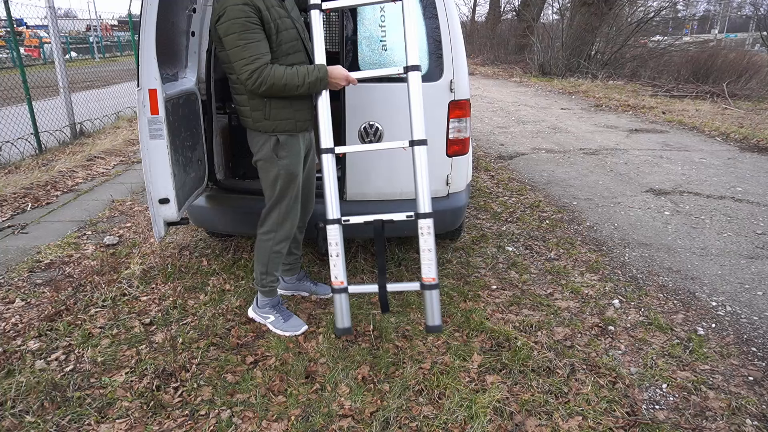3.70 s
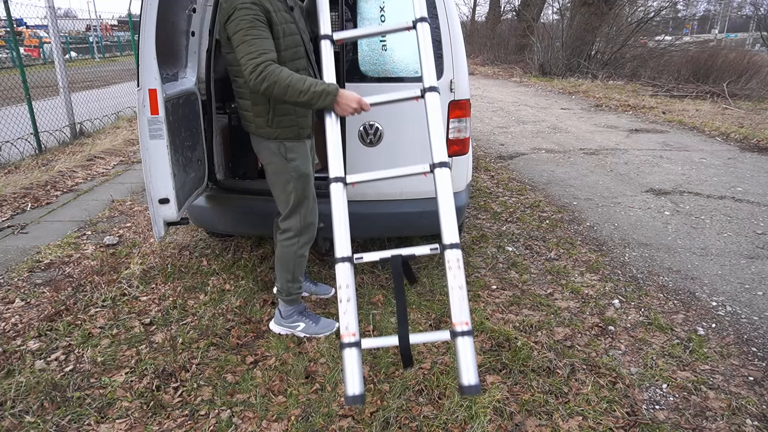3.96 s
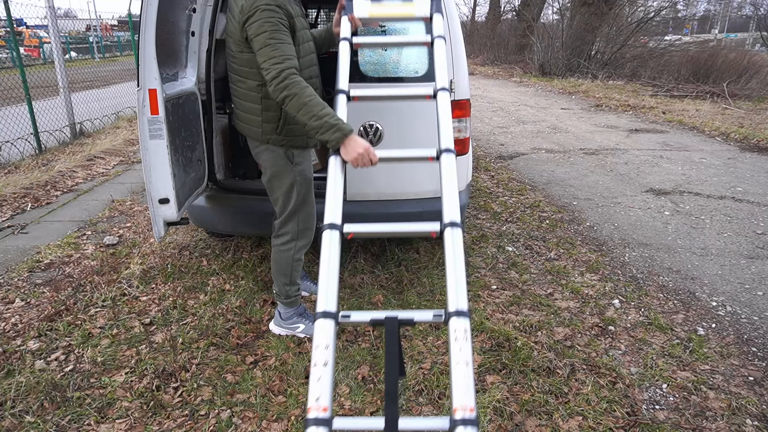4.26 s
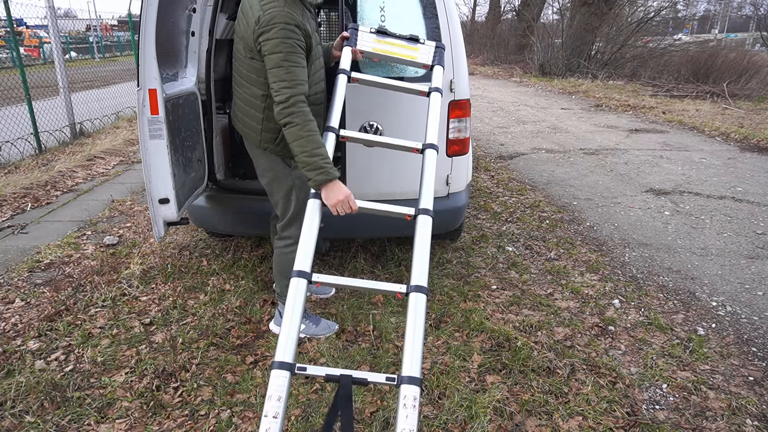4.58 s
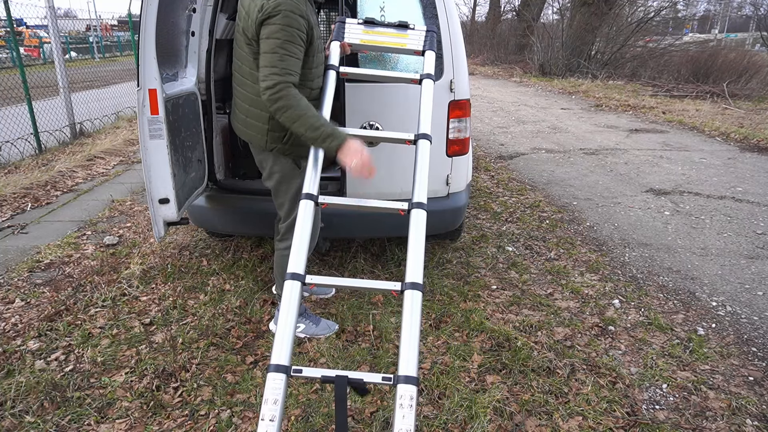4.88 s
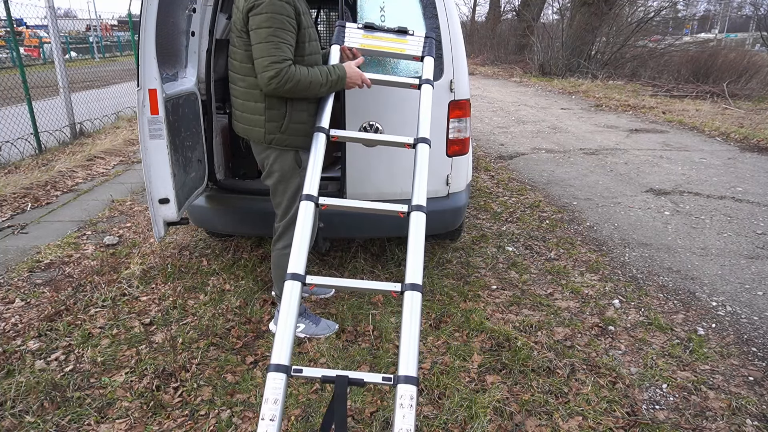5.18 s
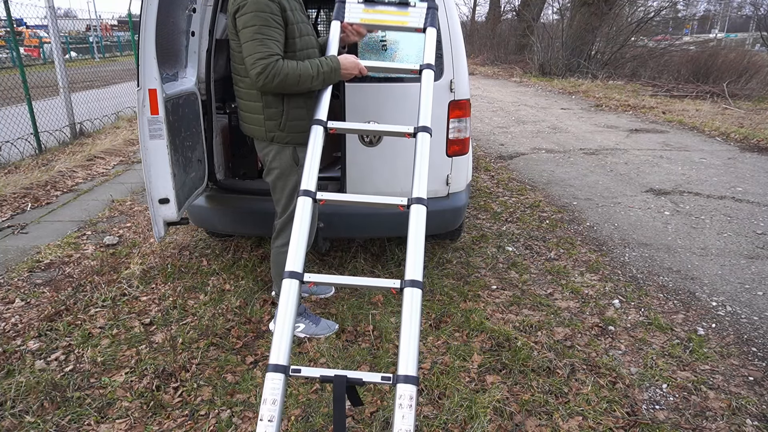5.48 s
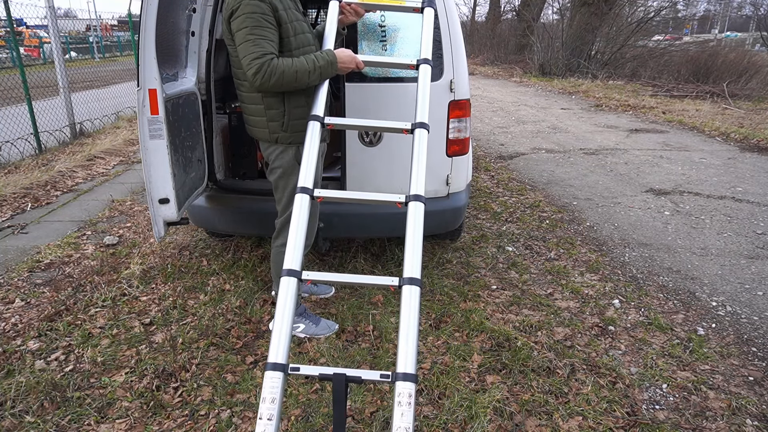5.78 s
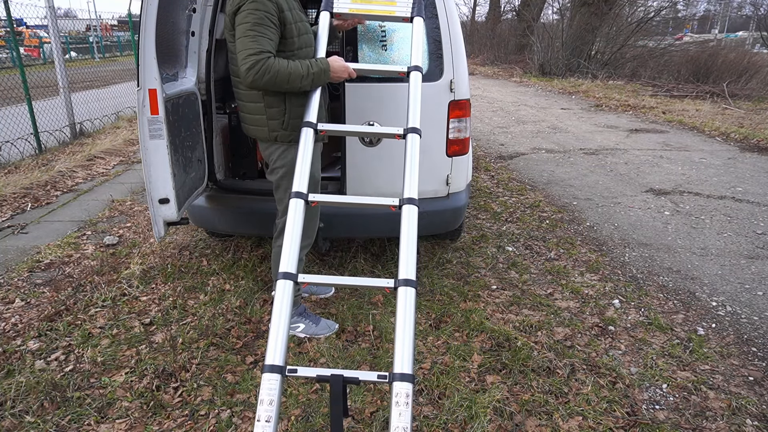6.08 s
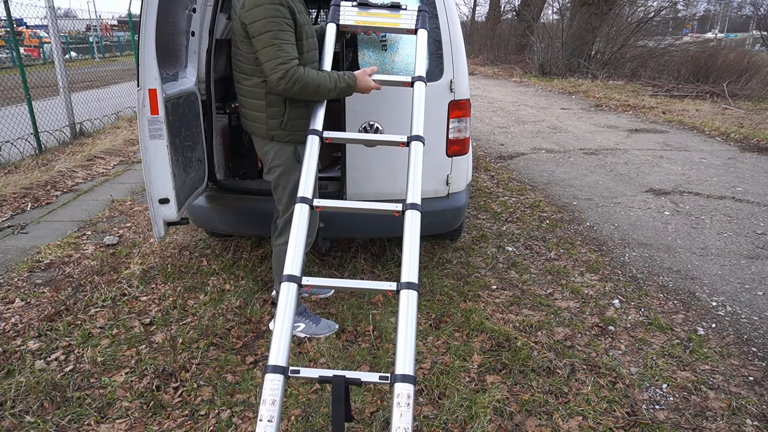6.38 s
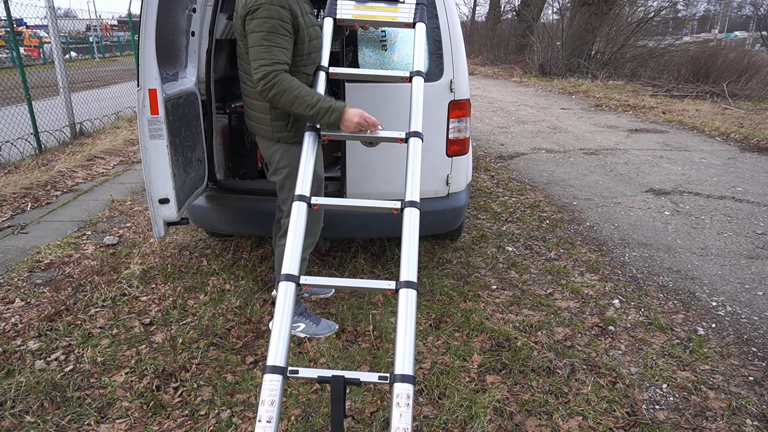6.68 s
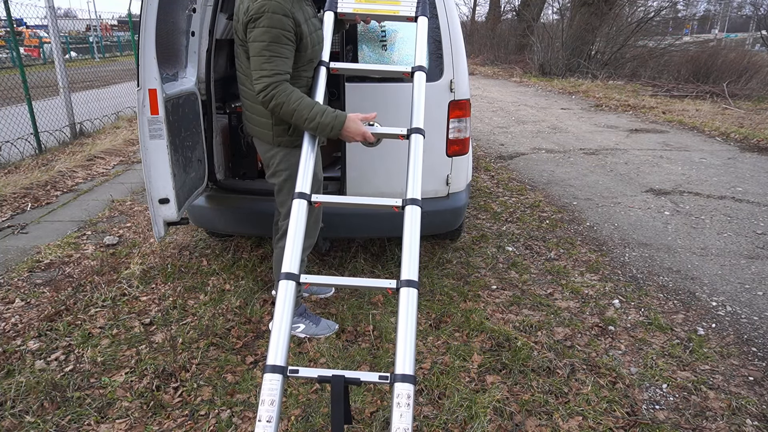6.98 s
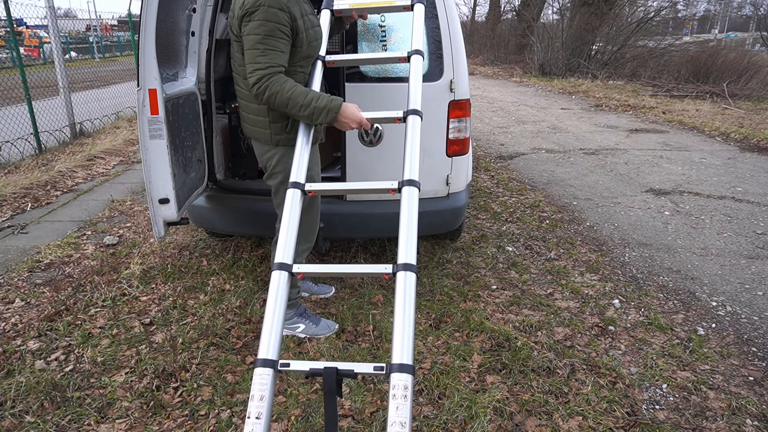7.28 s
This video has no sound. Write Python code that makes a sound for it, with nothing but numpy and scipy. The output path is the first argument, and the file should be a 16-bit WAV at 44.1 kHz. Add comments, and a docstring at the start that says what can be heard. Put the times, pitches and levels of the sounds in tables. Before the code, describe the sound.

Close by outdoors, an aluminium telescopic ladder is pulled out section by section. Tubes hiss through plastic collars and knock into their latches in a quick run of sharp clicks and rattles, the hardest snaps distorting slightly. In a lull, nylon jacket sleeves swish among a few ticks. One last slide snaps home, followed by scattered rattles, bumps and knocks. Distant traffic hums steadily throughout.

```python
"""Tyres roar on a distant road and a nylon jacket rustles as a man, close by on a verge, pulls out an
aluminium telescopic ladder. Tubes hiss through their plastic collars, pins tick, and the sections knock
into their stops, one rail just after the other; the hardest latch snaps overload and clip. Loose sections
rattle and a hand bumps the frame. In a lull his sleeves swish as he reaches for the next rung, then a
last slide snaps home, and a few rattles, bumps and knocks follow."""
import sys
import numpy as np
from scipy import signal
from scipy.io import wavfile
from scipy.ndimage import map_coordinates

SR = 44100
rng = np.random.default_rng(int(sys.argv[2]) if len(sys.argv) > 2 else 0)


def log_audio(samples):
    """Write samples as a 16-bit WAV file to the path given in sys.argv[1]."""
    # one column per channel
    frames = np.atleast_2d(samples).T
    # limit to full scale, then quantise
    limited = np.clip(frames, -1, 1)
    pcm = np.round(limited * 32767).astype(np.int16)
    wavfile.write(sys.argv[1], SR, pcm)


N = 332514
TIME = np.arange(N) / SR
AGE = TIME[:SR // 3]  # time since a blow

# Levels in the tables are relative; each layer sets its own gain.
# passing traffic: t/s, level/dB, nominal tyre pitch f/Hz
TRAFFIC = [(0, -34.5, 930), (.6, -34.5, 927), (1.3, -34.5, 924), (2.3, -35.5, 910), (3.6, -34.5, 950),
           (4.5, -34, 1037), (5.5, -35, 986), (6.2, -33, 1035), (7.54, -33, 983)]
# tone of the road, engine rumble below and tyre roar above: f/Hz, level/dB
ROAD_SPECTRUM = [(25, -59), (45, -8.5), (85, -2.5), (130, -6.5), (240, -14.5), (370, -13), (520, -9.5),
                 (720, -6.5), (950, -0.5), (1400, -6.5), (2200, -19.5), (3800, -31.5)]
# faint bed of jacket rustle: t/s, level/dB
RUSTLE_BED = [(0, -48), (.55, -46), (.75, -49), (1.25, -53), (2.9, -47.5), (3.45, -43), (3.6, -72),
              (4.95, -57.5), (5.15, -49), (6.3, -43.5), (7.54, -56.5)]
# sleeve swishes as the arms reach: loudest moment t/s, level/dB, half length/s
SWISHES = [(0.494, -48, 0.25), (1.314, -38.5, 0.036), (3.128, -42.5, 0.037), (3.324, -36.5, 0.036),
           (3.996, -39, 0.066), (4.155, -43, 0.12), (4.775, -41, .03), (6.076, -38.5, 0.034),
           (6.58, -43.5, 0.057), (7.106, -34.5, 0.056), (7.219, -36, 0.039), (7.454, -36.5, .11)]
# tone of rubbing nylon: f/Hz, level/dB
NYLON_SPECTRUM = [(150, -3), (450, -2), (1000, -21), (3000, -10), (4300, -2.5), (7500, -5.5), (9000, -4),
                  (12000, -6), (13500, -11.5), (16000, -12)]
# tubes sliding through collars: start t/s, end t/s, full-speed level/dB, run-up/s
TUBE_SLIDES = [(0.11, 0.367, -36, 0.11), (0.83, 1.043, -32, 0.082), (1.343, 1.835, -27, 0.13),
               (1.87, 2.813, -40.5, 0.017), (5.312, 5.66, -35.5, 0.32)]
# resonances that sing, one list a slide: f/Hz, half width/Hz, level/dB
SLIDE_RESONANCES = [
    [(1410, 650, 6.5), (4400, 920, 5), (6400, 660, 0), (8600, 690, 2), (11200, 820, -3)],
    [(474, 150, -2), (3580, 350, -7), (5650, 500, -16.5), (11200, 900, -16)],
    [(488, 164, 2), (880, 140, 2), (1470, 280, 3.5), (1790, 510, -4.5), (3800, 1200, -8), (4440, 380, -12),
     (6370, 500, -5), (7100, 450, -6), (7900, 400, -7), (12300, 2600, -19.5)],
    [(477, 104, 8.5), (2430, 630, -6), (3360, 97, -3), (4330, 970, -6.5), (6070, 1100, -7),
     (10200, 2000, -16)],
    [(1550, 270, 7), (2040, 350, 6), (2600, 220, -2), (3630, 300, -0.5), (4900, 520, -4.5),
     (9750, 3000, -11), (14300, 1200, -14)],
]
# bass, middle, presence and top bands of the hits: low f/Hz, high f/Hz
HIT_BANDS = [(190, 700), (700, 2300), (2500, 8000), (8000, 14500)]
# locking pins and small loose parts: t/s, level/dB, top against presence/dB, ring f/Hz
PIN_TICKS = [(0.1168, -17.5, 0.5, 4000), (0.3981, -19.5, 4, 11300), (1.0659, -17, 5, 11300),
             (1.807, -10.5, -6, 6500), (3.0725, -15.5, 5.5, 12320), (3.124, -25.5, 7, 8800),
             (3.2753, -19.5, 1, 12100), (3.283, -14, 4.5, 11000), (3.3358, -23.5, -5.5, 6600),
             (4.6036, -19, -20, 5400), (5.685, -15, -20, 4350), (5.8469, -26.5, 1, 3170),
             (6.218, -24, -2, 1160), (6.474, -12, 1, 4770), (7.4345, -25.5, 2, 5000)]
# sections hitting a stop or latch: t/s, second rail lag/ms, first rail level/dB, second rail level/dB,
# chatter/ms, bass/dB, middle/dB, top/dB (all three against presence), tube f/Hz, favoured frame f/Hz
STOP_KNOCKS = [(0.118, 9, -18, -16, 1.3, -1, 0, -30, 1150, 250),
               (0.318, 10.8, -13, -15, 2.9, -4.5, 3, -14, 3690, 330),
               (0.5997, 12.8, -11, 4.5, 4.3, -20, 2.5, -13, 1550, 330),
               (0.66, 14.3, -9, -10, 5.8, -5.5, -3.5, -5, 5930, 500),
               (1.009, 6.4, -4.5, 3.5, 4.7, -8, -2, -6.5, 4600, 320),
               (1.111, 12.3, -20.5, -19, 3, -0.5, 1, -12, 4540, 800),
               (1.320, 4.4, -31, -14, 2.4, -20, 2, -13, 4200, 500),
               (1.5158, 9.5, -8, -11.5, 6.4, -1.5, 3, -10, 1340, 800),
               (1.7448, 2, -14, -14, 1.3, -10, 10, -10, 1450, 500),
               (1.7874, 3.5, -15, 4.5, 4.2, -11, -0.5, -7, 7050, 330),
               (1.869, 9.6, -11, -12, 2.06, -3.5, -4, -3, 4760, 250),
               (2.0483, 5.5, -6, 0.5, 10.5, -7.5, -8, -3, 1850, 570),
               (2.251, 6, -28.5, -23.5, 4.7, -7, 2, -22, 2520, 350),
               (2.445, 15.5, -15.5, -17.5, 2.25, -5, 2.5, 3, 7550, 480),
               (2.51, 4.8, -14.5, -8, 4.9, -2.5, 3, -5.5, 7320, 820),
               (3.367, 4.9, -28, -15.5, 1.25, -1, -7, -12, 6170, 430),
               (4.589, 8.3, -18, -12, 5.5, 0.5, 5, -6.5, 5340, 700),
               (5.639, 12.9, -17.5, 1, 10.6, -18, -2.5, -10, 3047, 520),
               (5.917, 16.7, -28, -15, 2.6, -14, 3, 5, 2560, 500),
               (6.7124, 3.96, -31, -15, 2.8, 3.5, 3, -10, 6030, 510),
               (7.0386, 3, -10.5, -20, 2.4, -0.5, 6.5, 10.5, 4820, 450)]
# lasting ring of the whole ladder: f/Hz, level/dB, t60/s
LADDER_MODES = [(1570, 3.5, 0.08), (1750, 11, 0.1), (2960, 8.5, 0.13), (4350, 20.5, 0.086), (5360, -6, .08),
                (6360, -30, 0.054), (7700, -19, .07), (8300, -17, .07), (9900, -11, .06)]
# hollow body of the frame, stirred by the bass of a blow: f/Hz, level/dB, t60/s
FRAME_MODES = [(260, -13, 0.043), (361, -8.5, .07), (512, 17, 0.034), (807, -1.5, .045)]
# loose sections shaking in their collars: t/s, length/s, level/dB
SECTION_RATTLES = [(1.845, .055, -16.5), (2.274, .11, -30.5), (2.68, 0.037, -27), (5.768, .036, -19.5),
                   (5.896, .056, -15.5)]
# hands bumping the frame: t/s, level/dB, f/Hz, t60/s
HAND_THUDS = [(2.63, -28, 185, 0.092), (6.4757, -4, 221, 0.012), (7.161, -19, 217, 0.037),
              (7.298, -20, 229, 0.039)]


def undb(db):
    """Decibels to gain."""
    return 10 ** (np.asarray(db) / 20)


def unit(x):
    """Scale to an energy of 1."""
    return x / np.sqrt(np.sum(x ** 2))


def fade(t60):
    """Decay by 60 dB in t60 seconds."""
    return np.exp(-np.log(1000) * AGE / t60)


def ring(hz, t60):
    """One struck mode."""
    return np.sin(2 * np.pi * hz * AGE) * fade(t60)


def band(x, edges):
    """Band-pass between two edges in Hz."""
    return signal.sosfilt(signal.butter(3, edges, "band", fs=SR, output="sos"), x)


def add(out, s, x):
    """Mix x into out from time s."""
    i = int(s * SR)
    out[i:i + len(x)] += x[:N - i]


def colour(points, hz):
    """Gain of an EQ curve (f/Hz, level/dB) at the given frequencies."""
    f, db = np.transpose(points)
    return undb(np.interp(np.log(hz + 1), np.log(f), db))


def fader(curve, edge_s=0.012):
    """Gain along a curve (t/s, level/dB), with soft ends."""
    s, db = np.transpose(curve)
    soft_ends = np.clip(np.minimum(TIME - s[0], s[-1] - TIME) / edge_s, 0, 1)
    return undb(np.interp(TIME, s, db)) * soft_ends


def wobble(rate):
    """Random modulation gliding to a new value rate times a second."""
    return 0.82 * np.interp(TIME * rate, np.arange(N), rng.standard_normal(N))


def patches(rows, columns):
    """Smooth random modulation over frequency and time, both counted in patches."""
    grid = np.meshgrid(rows, columns, indexing="ij")
    return map_coordinates(rng.standard_normal((100, 400)), grid, order=1, mode="mirror")


def road(gain_db=4, usual_hz=1000, flicker_db=1.0, air_db_per_octave=-7.5):
    """Tyre roar swells and shifts pitch as cars pass, over engine rumble; distance takes the treble."""
    f, t, noise = signal.stft(rng.standard_normal(N), SR, nperseg=2048)
    hz = f[:, None]
    s, db, pitch_hz = np.transpose(TRAFFIC)
    tyre_share = np.clip(hz / 500, 0, 1)
    shift = (usual_hz / np.interp(t, s, pitch_hz)) ** tyre_share
    swell_db = tyre_share * np.interp(t, s, db - db.mean())
    swell_db += flicker_db * patches(2 * np.log2(f + 1), 8 * t)
    distance_db = air_db_per_octave * np.log2(np.maximum(hz / ROAD_SPECTRUM[-1][0], 1))
    spectrum = noise * colour(ROAD_SPECTRUM, hz * shift) * undb(swell_db + distance_db)
    roar = signal.istft(spectrum, SR)[1][:N]
    return unit(roar) * np.sqrt(N) * undb(db.mean() + gain_db)


def friction(response, grain_db, flutter_db, flutter_rate, patchy_db, patch_hz=330, patch_rate=22):
    """Tiny uneven slips through response(f, t); resonances come and go as the contact moves; rms 1."""
    slips = rng.standard_normal(N) * undb(grain_db * wobble(1500) + flutter_db * wobble(flutter_rate))
    f, t, force = signal.stft(slips, SR, nperseg=512)
    gain = response(f[:, None], t) * undb(patchy_db * patches(f / patch_hz, t * patch_rate))
    return unit(signal.istft(force * gain, SR)[1][:N]) * np.sqrt(N)


def jacket(fidget_db=6.0, fidget_rate=9, crease_db=-5):
    """Nylon sleeves brush the body: swishes swell over a restless rustle, creases flip and crackle."""
    def nylon(f, t):
        return colour(NYLON_SPECTRUM, f)
    rustle = fader(RUSTLE_BED) * undb(fidget_db * wobble(fidget_rate))
    swish_power = sum(undb(db) ** 2 * np.exp(-2 * ((TIME - s) / half) ** 2) for s, db, half in SWISHES)
    motion = np.sqrt(rustle ** 2 + swish_power)
    rub = friction(nylon, grain_db=5, flutter_db=3.5, flutter_rate=90, patchy_db=5.5)
    creases = friction(nylon, grain_db=2, flutter_db=9, flutter_rate=260, patchy_db=2)
    return motion * unit(rub + undb(crease_db) * creases) * np.sqrt(N)


def tube_slides(trims_db=(3, 2, 4, 2, 3), floors_db=(-18, -22, -20, -14, -14),
                octaves_per_s=(0, .8, -.25, 0, .15), run_up_db=-13):
    """A tube hisses in its collar, louder with speed; resonances glide as the free length changes."""
    out = np.zeros(N)
    for slide, modes, trim_db, floor_db, glide in zip(
            TUBE_SLIDES, SLIDE_RESONANCES, trims_db, floors_db, octaves_per_s):
        start, end, full_db, run_up = slide

        def tube(f, t):
            shift = 2 ** (glide * (np.clip(t, start, end) - (start + end) / 2))
            power = sum((undb(db) / (1 + ((f / shift - hz) / width) ** 2)) ** 2
                        for hz, width, db in modes)
            return np.sqrt(power + undb(floor_db) ** 2)
        speed = np.clip((TIME - start) / run_up, 0, 1)
        gain = fader([(start, full_db), (end, full_db)]) * undb(trim_db + run_up_db * (1 - speed))
        out += gain * friction(tube, grain_db=2.5, flutter_db=1.8, flutter_rate=250, patchy_db=3.2)
    return out


def pin_ticks(gain_db=21, middle_db=-11, tail_db=-24, ping_db=-5):
    """A small hard part snaps once: a tight crack with a faint tail and a short ping."""
    out = np.zeros(N)
    for s, db, top_db, hz in PIN_TICKS:
        burst = rng.standard_normal(len(AGE)) * (fade(t60=0.0055) + undb(tail_db) * fade(t60=0.091))
        top_edges = (8000, np.clip(1.5 * hz, 12500, 19000))  # smaller parts crack higher
        bands = [(HIT_BANDS[1], middle_db), (HIT_BANDS[2], 0), (top_edges, top_db)]
        crack = sum(undb(band_db) * unit(band(burst, edges)) for edges, band_db in bands)
        ping = undb(ping_db) * unit(ring(hz, t60=0.0087))
        add(out, s, undb(db + gain_db) * (unit(crack) + ping))
    return out


def metal_ring(force, tube_hz, frame_hz, bass_db, detune=.012, spot_db_per_octave=-40):
    """The force of a blow rings the struck tube, the whole ladder and the hollow frame."""
    # a slightly oval tube rings in a close pair
    tube = ring(tube_hz, t60=0.019) + ring(tube_hz * .95, t60=0.019)
    # the ladder's modes shift from blow to blow as its length changes
    ladder = sum(undb(db) * ring(hz * (1 + detune * rng.standard_normal()), t60)
                 for hz, db, t60 in LADDER_MODES)
    # the struck spot favours one resonance over its neighbours
    frame = sum(undb(db + spot_db_per_octave * abs(np.log2(hz / frame_hz))) * ring(hz, t60)
                for hz, db, t60 in FRAME_MODES)
    return sum(undb(db) * unit(signal.fftconvolve(force, part)[:len(AGE)])
               for part, db in ((tube, -5), (ladder, -17.5), (frame, bass_db - 5)))


def blow(chatter_ms, bass_db, middle_db, top_db, tube_hz, frame_hz, rebound_db=4, tail_db=-28):
    """Metal chatters on its stop for a few ms: a clack of crowded, fast-dying modes, and a ring."""
    chatter_s = max(chatter_ms, .5) / 1000
    touching = AGE < chatter_s
    rebounds = np.interp(AGE * 1000, np.arange(400), rng.standard_normal(400))
    contact = touching * undb(rebound_db * rebounds) * fade(5 * chatter_s)
    # light blows stir only the damped plastic collar, long heavy ones the tubes too
    t60s = np.array([.036, .026, .018, .014]) * (chatter_s / 0.0019) ** 0.3
    clack = 0
    for edges, t60, db in zip(HIT_BANDS, t60s, (bass_db - 2, middle_db, 0, top_db - 2)):
        # energy builds up while the parts touch, then drains
        drain = fade(t60) ** 2 + (undb(tail_db) * fade(t60=0.2)) ** 2
        energy = np.abs(signal.fftconvolve(contact ** 2, drain)[:len(AGE)])
        clack += undb(db) * unit(band(rng.standard_normal(len(AGE)) * np.sqrt(energy), edges))
    force = (contact * rng.standard_normal(len(AGE)))[touching]
    return np.sqrt(chatter_s * SR) * (unit(clack) + metal_ring(force, tube_hz, frame_hz, bass_db))


def stop_knocks(gain_db=0.55, bite_db=-16, bite_s=.012):
    """The collar bites just before the stop, then the rails land in turn: a scrape and a double hit."""
    out = np.zeros(N)
    lead_s = 4 * bite_s
    swell = np.exp(-2 * AGE[AGE < lead_s][::-1] / bite_s)
    scrape_edges = (HIT_BANDS[1][0], HIT_BANDS[2][1])
    for s, lag_ms, first_db, second_db, chatter_ms, bass_db, *tone in STOP_KNOCKS:
        scrape = band(rng.standard_normal(len(AGE)), scrape_edges)[:len(swell)]
        first_rail = blow(0.67 * chatter_ms, bass_db + 4.5, *tone)  # shorter and more hollow
        second_rail = blow(chatter_ms, bass_db, *tone)
        add(out, s - lead_s, undb(first_db + bite_db) * scrape * swell)
        add(out, s, undb(first_db + gain_db) * first_rail)
        add(out, s + lag_ms / 1000, undb(second_db + gain_db) * second_rail)
    return out


def section_rattles(taps=4, ring_hz=3800, spread_octaves=0.66, scatter_db=6.5):
    """A shaken section taps its collar a few times, unevenly, each time on another spot."""
    out = np.zeros(N)
    for s, span, db in SECTION_RATTLES:
        for k in range(taps):
            late, size, spot = rng.uniform(-1, 1, 3)
            tube_hz = ring_hz * 2 ** (spread_octaves * spot)
            tap = blow(chatter_ms=1.47, bass_db=-5, middle_db=1, top_db=-15,
                       tube_hz=tube_hz, frame_hz=380)
            onset = s + span * (k + .5 + 0.37 * late) / taps
            add(out, onset, undb(db + scatter_db * size) * tap)
    return out


def hand_thuds():
    """A soft bump of the hand swings one low, well damped mode of the frame."""
    out = np.zeros(N)
    for s, db, hz, t60 in HAND_THUDS:
        add(out, s, -undb(db) * ring(hz, t60))
    return out


def scene():
    """Ladder and jacket up front, the road far behind, in mono; open air gives no echo."""
    ladder = stop_knocks() + section_rattles() + pin_ticks() + hand_thuds() + tube_slides()
    return (ladder + jacket() + road())[None]


def record(dry):
    """The loudest snaps overload and clip hard; a steep low-pass trims the very top."""
    clipped = np.clip(dry, -1, 1)
    low_pass = signal.ellip(8, .2, 70, 15900, fs=SR, output="sos")
    return signal.sosfilt(low_pass, clipped)


dry = scene()
out = record(dry)
log_audio(out)
```